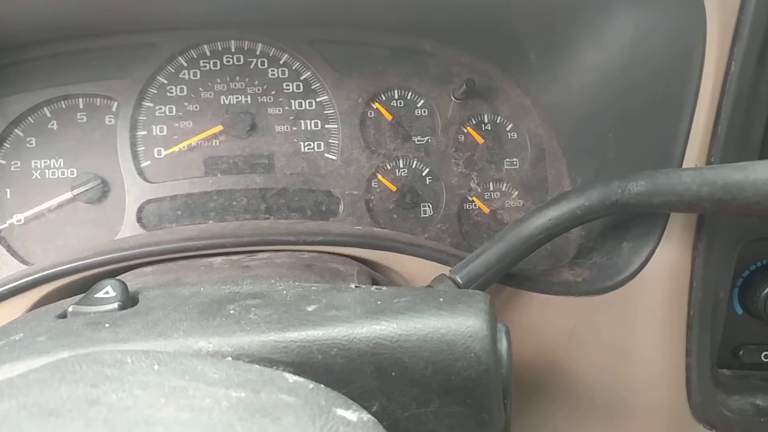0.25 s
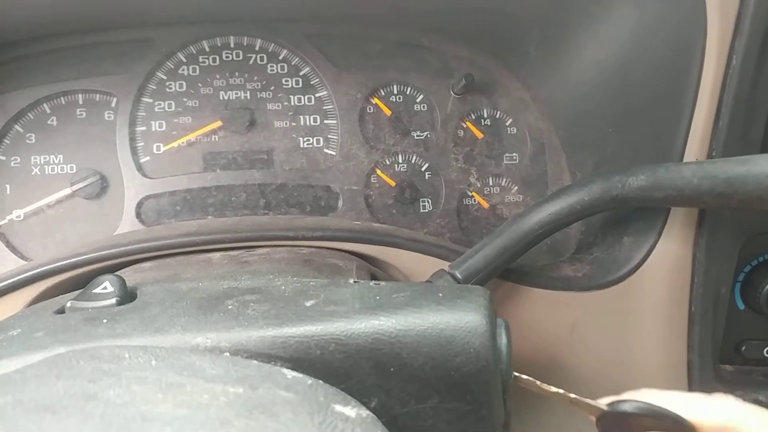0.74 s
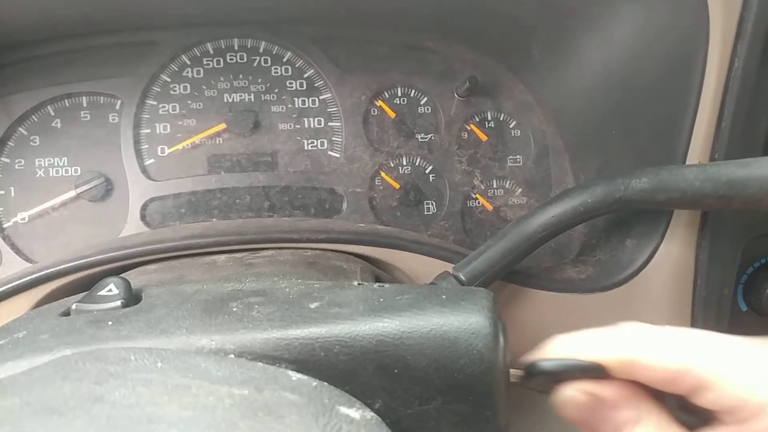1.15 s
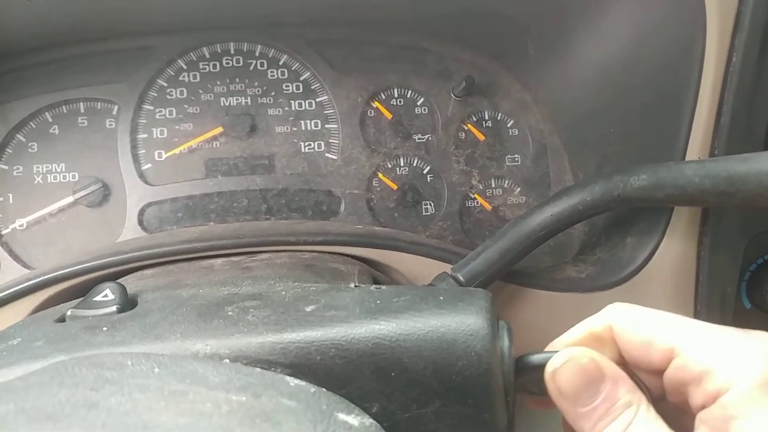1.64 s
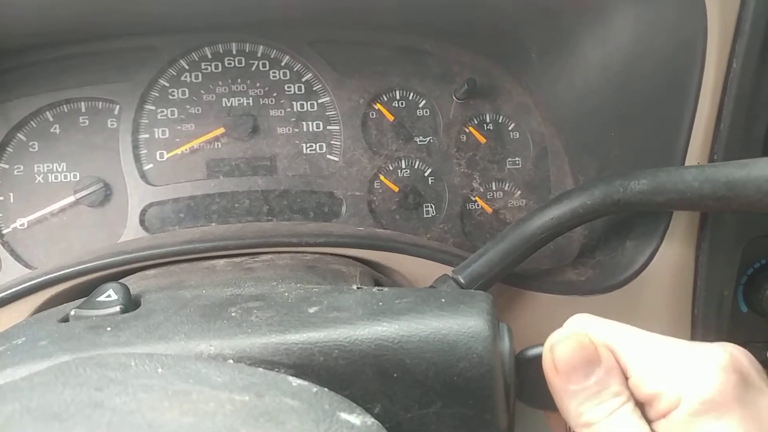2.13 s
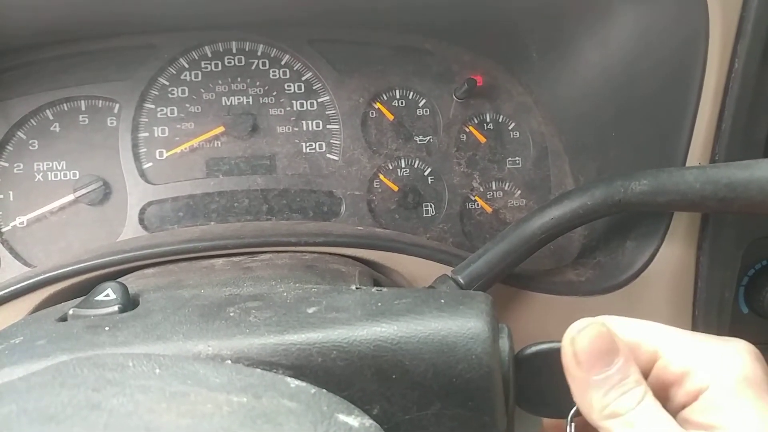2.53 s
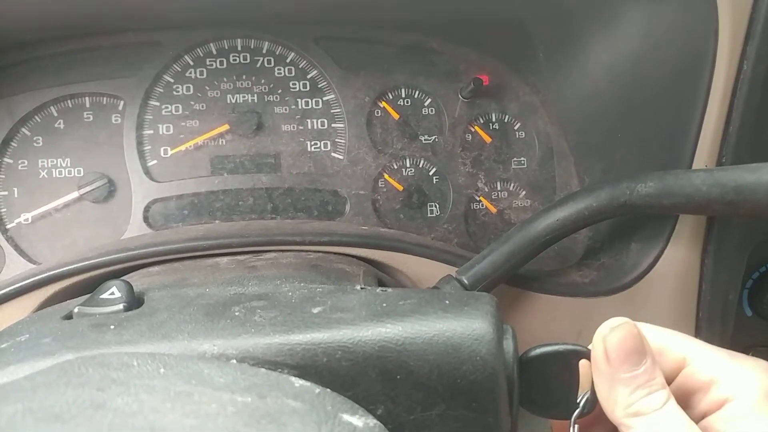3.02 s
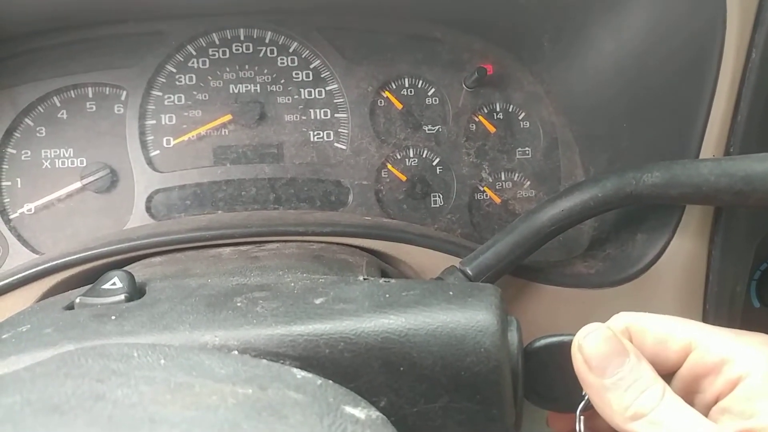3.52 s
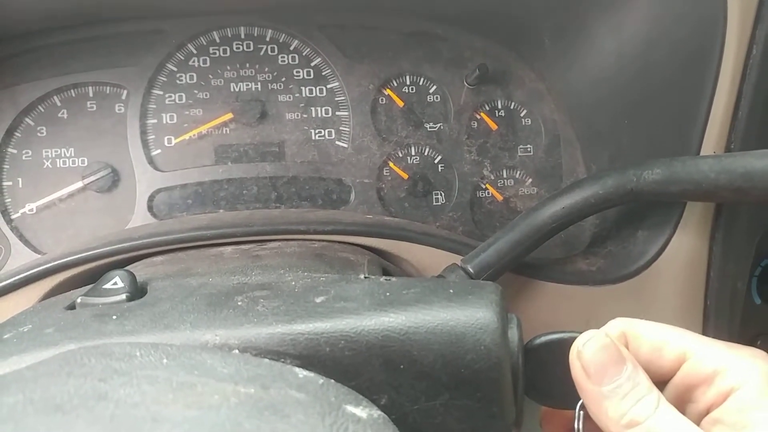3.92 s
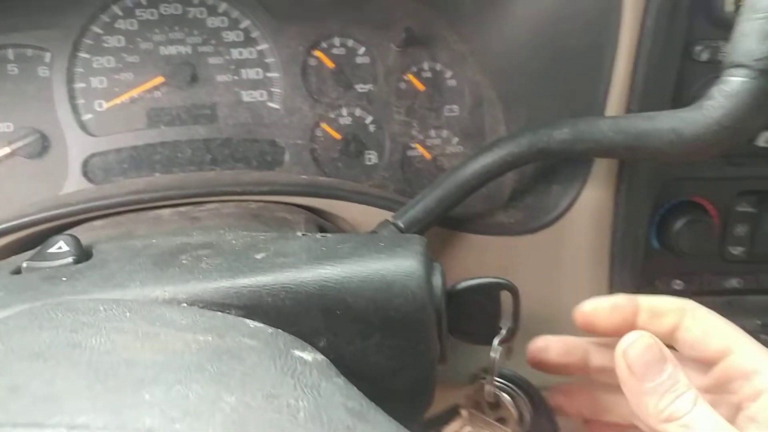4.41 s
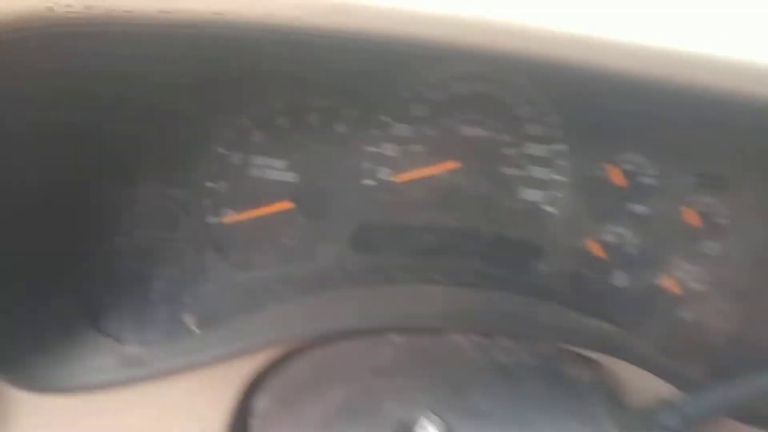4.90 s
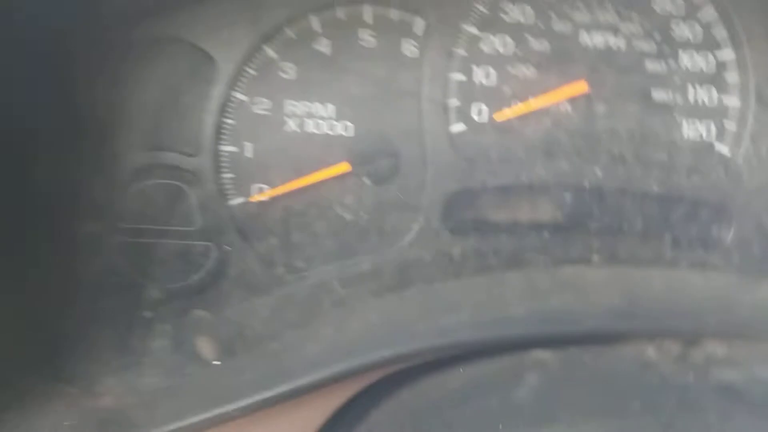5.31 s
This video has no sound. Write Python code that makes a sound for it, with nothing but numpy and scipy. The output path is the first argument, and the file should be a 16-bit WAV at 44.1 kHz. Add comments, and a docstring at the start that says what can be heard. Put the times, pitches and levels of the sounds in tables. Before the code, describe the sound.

Close hand-held stereo pickup in a parked cab: light ticks, a rasping key insertion ending in a bright snap, small rattling clicks, then a chunky detent clack as the key turns. A quiet stretch follows with faint rubbing and a thin distant bird, then handling creaks, soft thuds and a final hard plastic tap. Dull outside rumble continues throughout.

```python
"""Key turned in an ignition lock

A key is pushed into the lock of a parked vehicle and turned; nothing starts. Noise-excited resonances make pins
and detents click, beating sines make the key ring ping, shaped noise makes hand, sleeve and key blade rub.
Ringing noise rumbles from outside into the small padded cab, gliding sines are a far bird, filtered clicks creak
in the hand-held casing. The left microphone port hears the bass louder than the right."""
import sys
import numpy as np
from scipy import signal
from scipy.io import wavfile

SR = 44100
rng = np.random.default_rng(int(sys.argv[2]) if len(sys.argv) > 2 else 0)


def transcribe(signal):
    """Save signal, clipped to [-1, 1], as a 16-bit WAV file at the path in sys.argv[1]."""
    frames = np.atleast_2d(signal).T
    limited = np.clip(frames, -1, 1)
    pcm = np.round(limited * 32767).astype(np.int16)
    wavfile.write(sys.argv[1], SR, pcm)


N = 244755


def from_db(db):
    """Amplitude ratio of a level in dB."""
    return 10 ** (np.asarray(db) / 20)


def rms_one(x):
    """Scale to rms 1."""
    return x / np.sqrt(np.mean(x ** 2) + 1e-20)


def at_hz(points, hz):
    """Interpolate (Hz, value) points over log frequency."""
    point_hz, value = np.transpose(points)
    return np.interp(np.log(hz), np.log(point_hz), value)


def at_time(points, s):
    """Interpolate (s, value) points over time."""
    return np.interp(s, *np.transpose(points))


def sides(lean_db):
    """Left and right gains, lean_db apart, whose mean is 1."""
    gains = from_db([[lean_db / 2], [-lean_db / 2]])
    return gains / gains.mean()


def band(x, low_hz, high_hz):
    """Butterworth bandpass."""
    return signal.sosfilt(signal.butter(2, [low_hz, high_hz], "band", fs=SR, output="sos"), x)


def resonance(x, hz, width_hz):
    """Two-pole peak of gain 1."""
    r = np.exp(-np.pi * width_hz / SR)
    gain = (1 - r * r) / 2
    return signal.lfilter([gain, 0, -gain], [1, -2 * r * np.cos(2 * np.pi * hz / SR), r * r], x)


def double_resonance(x, hz, width_hz, second_hz, second_width_hz):
    """Two peaks in series: steeper skirts."""
    return resonance(resonance(x, hz, width_hz), second_hz, second_width_hz)


def drift(rate_hz):
    """Slow random curve of rms 1: lowpassed noise at 1/40 of the sample rate, interpolated."""
    r = np.exp(-80 * np.pi * rate_hz / SR)
    slow = signal.lfilter([1], [1, -2 * r, r * r], rng.standard_normal(N // 40 + 2002))[2000:]
    return np.interp(np.arange(N) / 40, np.arange(len(slow)), rms_one(slow))


def add(out, s, piece):
    """Mix a two-channel piece into out at time s."""
    at = round(s * SR)
    out[:, at:at + piece.shape[1]] += piece[:, :N - at]


# cab reverberation: (frequency [Hz], T60 [s])
CAB_T60 = [(150, 0.16), (500, 0.19), (1500, 0.082), (3000, 0.076), (8000, 0.043), (16000, 0.076)]
# hand-held microphone turns: (time [s], left port delay [samples])
LEFT_LAG = [(0.3, 10), (0.9, 5), (1.23, 20), (1.52, 6), (2.2, 1), (5.46, 9)]


def echoed(x, s, hz, echo_db):
    """Direct sound plus the cab's dense reflections, which build up in a few ms and differ per side and spot."""
    t = np.arange(len(x)) / SR
    decay = from_db(-60 * t / at_hz(CAB_T60, hz))
    buildup = 1 - np.exp(-t / 0.00051)
    tail = rng.standard_normal((2, len(x))) * decay * buildup
    tail *= from_db(echo_db) / np.sqrt(np.sum(tail ** 2, axis=1, keepdims=True))
    direct = np.array([np.roll(x, round(at_time(LEFT_LAG, s))), x])
    return direct + signal.fftconvolve(x[None], tail, axes=1)[:, :len(x)]


# noise floor spectrum: (frequency [Hz], relative density [dB per Hz])
FLOOR = [(76, -30), (130, -1.5), (269, -9), (298, -13.5), (420, -9.5), (465, -9), (569, -16), (1330, -21.5),
         (1590, -25), (14700, -35), (16300, -39)]
# port correlation, negatives count as 0: (frequency [Hz], left-right likeness [0-1])
LIKENESS = [(60, 1), (240, 0.68), (950, 0.29), (3770, -0.015), (15000, -0.25)]
# port balance: (frequency [Hz], left over right [dB])
LEAN = [(60, 10.5), (240, 5), (950, 7), (3770, 2.5), (15000, -1)]


def noise_floor(level_db=-65.5, flicker_db=1.07):
    """Half-octave noise bands, each with its level, lean, likeness and flicker."""
    source = rng.standard_normal((2, 2, N))
    out = 0
    edges_hz = 110 * 2 ** np.arange(0, 8, .5)
    for k, (low, high) in enumerate(zip(edges_hz, edges_hz[1:])):
        hz = np.sqrt(low * high)
        mid, side = band(source[k % 2], low, high)
        alike = np.clip(at_hz(LIKENESS, hz), 0, 1)
        pair = np.sqrt(1 + alike) * mid + np.sqrt(1 - alike) * side * [[1], [-1]]
        gain = from_db(at_hz(FLOOR, hz) + flicker_db * drift(6))
        out = out + gain * sides(at_hz(LEAN, hz)) * pair
    return from_db(level_db) * out / np.sqrt(np.mean(out.mean(0) ** 2))


# rumble envelope: (time [s], level [dB])
RUMBLE = [(0.0, -55.5), (0.73, -52.5), (1.1, -59), (1.361, -52.5), (1.761, -55.5), (2.19, -53.5),
          (2.52, -61), (2.74, -59), (3.37, -55), (3.46, -57.5), (3.99, -53), (4.65, -54.5), (5.091, -52),
          (5.55, -49.5)]
# cab air and panel modes: (frequency [Hz], width [Hz], level [dB])
RUMBLE_MODES = [(43.7, 34, -3), (65.78, 28, 0.5), (87.24, 4.3, 1.5), (135, 38, -14.5)]


def rumble(swell_db=1):
    """Far traffic and wind through the body shell, ringing the cab's lowest modes."""
    white = band(rng.standard_normal((2, N + SR)), 34, 260)
    modes = sum(from_db(db) * rms_one(double_resonance(white, hz, width, hz, 2 * width))
                for hz, width, db in RUMBLE_MODES)
    mid, own = modes[:, SR:]   # filters settle in the first second
    pair = sides(11.0) * np.array([mid, .9 * mid + .43 * own])
    gain = from_db(at_time(RUMBLE, np.arange(N) / SR) + swell_db * drift(5.5))
    return gain * pair / np.sqrt(np.mean(pair.mean(0) ** 2))


# rub hiss rung through a narrow port resonance near 1.8 kHz, plus one higher faint squeak: (start [s], length
# [s], level [dB], frequency [Hz], width [Hz])
TONED_HISSES = [(0.066, 0.067, -72.5, 1720, 250), (0.204, 0.042, -70, 1760, 200),
                (1.598, 0.17, -75.5, 2270, 150), (5.368, 0.066, -73, 1850, 303)]


def toned_hisses():
    """Breathy noise through a narrow double resonance: the ports ringing under some rubs, and one faint squeak."""
    out = np.zeros((2, N))
    for s, length, level_db, hz, width_hz in TONED_HISSES:
        noise = rng.standard_normal(round(length * SR))
        tone = rms_one(double_resonance(noise, hz, width_hz, hz, 2 * width_hz))
        add(out, s, from_db(level_db) * sides(13.0) * tone * np.hanning(len(noise)) ** .5)
    return out


# friction bands: (low [Hz], high [Hz])
BANDS_HZ = [(200, 1200), (1200, 3000), (3000, 7000), (7300, 9800), (11200, 15800)]


def friction(table, drag_colour_db, hiss_colour_db, crackle, grain_db=1.5, snags_per_s=340):
    """Swells of friction noise, a dull drag plus a bright hiss; stick-slip makes the level flutter and crackle."""
    out = np.zeros((2, N))
    for s, length, drag_db, hiss_db in table:
        size = round(length * SR)
        drag = from_db(np.add(drag_db, drag_colour_db))
        hiss = from_db(np.add(hiss_db, hiss_colour_db))
        grains = 1 + crackle * np.exp(-rng.random(size) * SR / snags_per_s)
        swell = np.hanning(size) ** .5
        for (low, high), gain in zip(BANDS_HZ, np.hypot(drag, hiss)):
            noise = rms_one(band(grains * rng.standard_normal((2, size)), low, high))
            add(out, s, gain * sides(at_hz(LEAN, low) + 1.9) * swell * noise)
    return out * from_db(grain_db * drift(87.7))


# skin and cloth rubs: (start [s], length [s], dull drag [dB], bright hiss [dB])
RUBS = [(0.067, 0.047, -79, -78), (0.203, 0.065, -74, -78.5), (1.028, 0.05, -85, -70),
        (1.618, 0.088, -69.5, -77.5), (3.052, 0.043, -66.5, -90.5), (3.19, 0.051, -68.5, -93.5),
        (3.665, 0.032, -64, -89.5), (3.851, 0.05, -67.5, -87), (3.89, 0.042, -72.5, -76),
        (4.178, 0.036, -78, -70.5), (4.312, 0.098, -60.5, -78.5), (4.38, 0.14, -57, -77.5),
        (4.558, 0.097, -72, -61.5), (4.928, 0.32, -66.5, -84.5), (5.182, 0.059, -64.5, -76),
        (5.23, 0.083, -63, -72.5), (5.359, 0.15, -71, -64.5), (5.465, 0.083, -58.5, -64.5)]
# colours over the friction bands: (gain per band [dB])
RUB_DRAG_DB = [-0.5, -26, -17.5, -40, -33.5]
RUB_HISS_DB = [-30, -3, -2.5, 1.5, -3.5]


def rubs():
    """Hand and sleeve: strongly crackling friction."""
    return friction(RUBS, RUB_DRAG_DB, RUB_HISS_DB, crackle=8.0)


# plastic steering column modes: (frequency [Hz], width [Hz], level [dB])
COLUMN = [(180, 60, -6), (336, 17, -4), (469.2, 130, -11.5), (620, 120, -8.5), (820, 67, -13.5),
          (1028.5, 80, -2), (1340, 61, 0.5), (1850, 48, 0), (1995, 84, -3), (2350, 100, -6),
          (2720, 50, -0.5), (3160, 170, -10), (3460, 100, -11), (3720, 100, -8.5)]
# lock balance before scaling by pitch: (time [s], left over right [dB])
LOCK_LEAN = [(0.3, 21), (0.8, 9.5), (1.2, 11), (1.4, 10.5), (2.2, 10.5), (4.2, 2.5), (5.46, 12.5)]


def impact_parts(chatter, knock_hz, clack_hz, snap_hz, broad):
    """(Nominal Hz, signal) of thump, knock, column ring, clack, snap, tick, sheen and wide crack."""
    mellow = band(band(chatter, 46, 9600), 46, 9600)   # the ports pass little above their resonance
    column = sum(from_db(db) * resonance(mellow, hz, width) * (-1) ** k
                 for k, (hz, width, db) in enumerate(COLUMN))
    thump = double_resonance(mellow, 70, 110, 76, 180)
    knock = resonance(mellow, knock_hz, 180) + broad * band(mellow, 370, 1700)
    clack = double_resonance(mellow, clack_hz, 230, clack_hz, 1200)
    clack += broad * band(mellow, 0.55 * clack_hz, 1.45 * clack_hz)
    snap = double_resonance(mellow, snap_hz, 770, snap_hz, 1800)
    snap += broad * band(mellow, 0.7 * snap_hz, 1.4 * snap_hz)
    tick = double_resonance(mellow, 8700, 700, 8500, 1300)
    tick += broad * band(band(mellow, 6200, 9300), 5500, 12000)
    sheen = band(band(chatter, 9700, 16000), 10500, 14000)
    crack = band(mellow, 2200, 13000)
    return [(110, thump), (knock_hz, knock), (1500, band(column, 230, 4300)), (clack_hz, clack),
            (snap_hz, snap), (8700, tick), (13000, sheen), (4500, crack)]


def contacts(table, voice, rattle, broad):
    """A main blow amid lesser impacts that build up to it and chatter out; they ring lock, key and column.
    A harder contact tilts the parts towards the treble."""
    out, lead = np.zeros((2, N)), SR // 100
    ms = (np.arange(SR // 5) - lead) * 1000 / SR
    voice_db, knock_hz, rise_ms = voice
    for (s, blow_db, clack_hz, clack_db, snap_hz, hardness_db, fall_ms, echo_db,
         body_db, tick_db, snap_db) in table:
        shape = np.exp(np.where(ms < 0, ms / max(rise_ms, .05), -ms / max(fall_ms, .1)))
        chatter = rattle * rng.standard_normal(len(ms)) * rng.random(len(ms)) ** 5 * shape
        chatter[lead] = 1
        chatter = np.roll(chatter, round(SR * rise_ms / 1000))   # listed time is the start of the build-up
        parts = impact_parts(chatter, knock_hz, clack_hz, snap_hz, broad)
        low_db = np.add(voice_db[:3], body_db)
        high_db = np.add(voice_db[3:], [snap_db, tick_db, 0, 0])
        echoes_db = [echo_db] * 7 + [echo_db + 8]   # the wide crack is heard mostly through the cab
        lock_lean_db = at_time(LOCK_LEAN, s)
        for (hz, part), wet_db, part_db in zip(parts, echoes_db, [*low_db, clack_db, *high_db]):
            tilt_db = hardness_db * np.log2(max(hz, 350) / 2500)
            part = from_db(blow_db + part_db + tilt_db + 10.0) * part / np.abs(part).max()
            # the ports differ less in the treble
            lean_db = lock_lean_db * np.clip(np.log(9000 / hz) / 1.9, .1, 1.1)
            add(out, s - lead / SR, sides(lean_db) * echoed(part, s, hz, wet_db))
    return out


# key and lock contacts that snap with almost no build-up: (time [s], level [dB], clack [Hz], clack relative
# level [dB], snap [Hz], # hardness [dB per octave], chatter decay [ms], cab echo [dB], extra into column [dB],
# extra tick [dB], # extra snap [dB])
SNAPS = [(0.3126, -37.5, 2700, -8.5, 4470, 2.5, 0.37, -6.5, -6, 1.5, -1.5),
         (0.314, -44.5, 2050, -7.5, 4400, 2, 0.55, 1, -6, 4, -1),
         (1.0359, -59.5, 2750, -11, 6230, 1, 1.5, -10, 0, 2, 0),
         (1.2176, -20, 3900, -12, 5860, -2, 1.1, 7, -3, 0.5, -2),
         (1.2205, -25.5, 1330, -6.5, 4000, 1.5, 1.1, 2.5, -4, -5, 1),
         (1.2274, -15, 4010, -14.5, 5500, 1, 2.5, 3, 2, 0.5, 2),
         (1.2314, 2, 4760, -25, 6100, -1.5, 0.77, -2, -9.5, -14, 0.5),
         (1.2342, -15, 2840, -7.5, 5900, -0.5, 1.7, -5, 5, -7, -3),
         (1.2392, -19, 2130, -13, 6110, -3.5, 2.7, -5, 4.5, -1, -7),
         (1.2442, -23.5, 1630, -10, 5960, 0, 1.3, -3, 3, 0, -11),
         (1.298, -43, 2700, -16, 6300, 0, 1.1, 0, 3, 7, -5),
         (1.3205, -47.5, 2350, -12, 5230, -0.5, 3, 7, -4, 11, -6),
         (1.3918, -45.5, 3350, -13, 4240, 6.5, 0.81, 3, 6, -4, -3),
         (1.3955, -46.5, 3300, -13, 6550, -5, 0.6, -4, 3, 2, -1.5),
         (1.5025, -50, 2920, -9, 5500, 3, 0.76, 4.5, -0.5, 6.5, -3),
         (1.5068, -52.5, 2000, -14.5, 6960, 2, 0.65, -1.5, 1, 5, 2),
         (2.1525, -36.5, 3031, -14.5, 5600, -2, 1.69, -4, 0, -9.5, 0),
         (4.1824, -61, 1527, -20, 6584, -0.5, 0.5, -5, -3.5, 2.5, 0),
         (4.9032, -53, 1520, -17.5, 6970, -1, 0.89, -3, -4, 4, -11),
         (5.4632, -14, 1827, -17, 4380, 3.5, 0.6, -7, 1.5, 2.5, -3),
         (5.4643, -17, 1850, -14.5, 5350, 3, 0.65, -9.5, 1.5, 3.5, 2),
         (5.5305, -56, 1610, -17.5, 4650, 7, 0.4, -1, -7.5, 1, 2)]
# part mix: ((thump, knock, column ring, snap, tick, sheen, wide crack) relative levels [dB], knock [Hz],
# build-up [ms])
SNAP_VOICE = [-35.5, -25, -24.5, -10, -13.5, -24, -23], 450, 0.19


def snaps():
    """Hard contacts that snap once, with next to no build-up."""
    return contacts(SNAPS, SNAP_VOICE, rattle=.3, broad=0.17)


# far bird notes: (start [s], length [s], first [Hz], last [Hz], arch above the glide [Hz], level [dB])
BIRD = [(.378, .04, 8250, 8400, 123, -89), (.535, 0.067, 8500, 8400, 418, -105),
        (.6, .08, 7050, 7000, 30.2, -93), (2.355, .18, 7030, 7000, 180, -87.5),
        (2.55, 0.11, 7200, 7030, 59.7, -89), (2.802, 0.24, 7080, 7170, 180, -86),
        (4.675, 0.077, 7220, 7140, 30.2, -84.5), (4.769, 0.13, 7130, 6930, 80, -86)]


def bird(edge_s=0.0098, waver_db=3, waver_hz=45):
    """Thin, unsteady whistles that arch in pitch and fade in and out."""
    out, t = np.zeros(N), np.arange(N) / SR
    for s, length, first_hz, last_hz, arch_hz, level_db in BIRD:
        along = np.clip((t - s) / length, 0, 1)
        glide_hz = first_hz + (last_hz - first_hz) * along + arch_hz * np.sin(np.pi * along)
        hz = glide_hz + waver_hz * drift(40)
        shape = np.clip(np.minimum(t - s, s + length - t) / edge_s, 0, 1)
        gain = np.sqrt(2) * from_db(level_db + waver_db * drift(25))
        out += gain * shape * np.sin(2 * np.pi * np.cumsum(hz) / SR)
    return out


# lock pins and detents: (time [s], level [dB], clack [Hz], clack relative level [dB], snap [Hz],
# hardness [dB per octave], chatter decay [ms], cab echo [dB], extra into column [dB], extra tick [dB],
# extra snap [dB])
CLACKS = [(0.756, -41, 2650, -4, 1900, -1, 0.56, 1, -10, -2, 7),
          (0.7585, -39, 1320, -10, 2730, -4, 0.8, 3, -5, -2, 0),
          (0.8097, -51, 2040, -9, 5820, -3.5, 1, 4.5, -1, -2, 5),
          (0.8418, -52.5, 2200, -18, 2780, -2, 1.6, -1, 5.5, 1, -5),
          (0.8575, -38.5, 2000, -4, 3500, -0.5, 1, 2, -5, -10, 11),
          (0.8598, -31.5, 3480, -3.5, 2000, -3.5, 2.0, -0.5, -11.5, -18, 10.5),
          (0.8695, -43.5, 3620, -14, 1900, -3, 2.9, -1.5, -4, 2, 1),
          (0.9881, -66.5, 1560, -24, 3640, -10, 5, 1, -0.5, 0, 0),
          (1.1825, -40, 1770, -11, 3580, -2, 1.4, 0, 0.5, 0.5, -2),
          (1.338, -43.5, 2500, -16, 3160, -1.5, 8, 4, 0.5, -4, -7),
          (1.374, -36.5, 1120, -12, 3650, -6, 1.1, -1, -1.5, 0, -2),
          (1.3845, -46, 1130, -17, 3530, -9.5, 1.2, -5, 2.5, 8, -4),
          (1.4514, -51.5, 2310, 0.5, 4500, 7, 3, 3, -18, -5, 12),
          (1.4693, -38, 1400, -21, 2306, -5, 0.91, 1.5, 1, -2, -13),
          (1.4745, -42.5, 980, -12.5, 5200, -7, 0.9, -3, 1.5, -4, 1),
          (1.485, -46, 1900, -14, 3600, -2, 2, -7, 1, -4, 0),
          (1.522, -28, 1860, -10, 3520, -2.5, 2.0, -2, -2, -9.5, -0.5),
          (1.5245, -39, 3510, -5.5, 4820, -3, 0.8, 1, -15, -14, -7),
          (1.6114, -64.5, 1270, -24.5, 5050, -3.5, 5, 6, 3, -1, -0.5),
          (2.1565, -23, 2495, -9, 5000, 1.5, 2.3, 1.5, 1.5, -1, 3),
          (2.1597, -23.5, 1980, -12, 3530, -0.5, 1.9, -1, -3, -2.5, 3.5),
          (2.2098, -24, 1850, -14, 4040, 0, 0.91, -5, 0.5, 1.5, 3),
          (2.2122, -14, 2700, -10.5, 4320, 1.5, 0.51, -6.5, 1.5, 1.5, 4),
          (2.2141, -10, 1370, -18, 4370, -0.5, 0.5, -6.5, 2, 0, 1.5),
          (2.2168, -13.5, 1850, -10, 5320, 1.5, 1.2, -3.5, -0.5, -1, 2),
          (2.223, -22.5, 1980, -13.5, 3300, -1, 3, -0.5, -2, -1.5, 3),
          (2.2335, -28.5, 2000, -10.5, 3500, 0, 5, -0.5, 0.5, -2, 2.5),
          (2.249, -38, 1904, -11, 3782, 2.5, 3, -4.5, -3.5, -2, 2),
          (5.243, -63.5, 1332, -8, 4017, -0.5, 5.9, 1, 4, 0, 5)]
# part mix: ((thump, knock, column ring, snap, tick, sheen, wide crack) relative levels [dB], knock [Hz],
# build-up [ms])
CLACK_VOICE = [-38.5, -15.5, -13, -18.5, -10.5, -27.5, -18], 1030, 1.2


def clacks():
    """Pins and detents: contacts with a longer build-up."""
    return contacts(CLACKS, CLACK_VOICE, rattle=.33, broad=0.6)


# low thuds: (time [s], level [dB], frequency [Hz], width [Hz])
THUDS = [(0.757, -56, 620, 80), (1.228, -39, 330, 41), (1.2, -36.5, 180, 32), (1.393, -47.5, 77.6, 18),
         (1.47, -49, 620, 89), (1.538, -39, 60.8, 18), (2.157, -47, 380, 73), (2.16, -50, 118, 18),
         (2.226, -47, 461, 70), (2.239, -45, 64, 18), (4.603, -41, 67.7, 18), (4.961, -46.5, 74.63, 18),
         (5.455, -44, 60, 25), (5.46, -45.5, 190, 42), (5.463, -50.5, 406, 80)]


def thuds():
    """Soft low thuds, as when the hand lands on the column: critically damped swells of a sine."""
    out, t = np.zeros((2, N)), np.arange(SR // 5) / SR
    for s, level_db, hz, width_hz in THUDS:
        swell = np.e * np.pi * width_hz * t * np.exp(-np.pi * width_hz * t)
        add(out, s, from_db(level_db) * sides(16.9) * swell * np.sin(2 * np.pi * hz * t))
    return out


# key blade over the pins: (start [s], length [s], dull drag [dB], bright hiss [dB])
STROKES = [(1.15, 0.066, -72, -64), (1.175, 0.1, -47, -56), (1.235, 0.066, -75, -43),
           (1.29, 0.062, -82, -52.5), (1.365, 0.087, -82, -62), (1.335, 0.04, -60, -65.5),
           (1.44, 0.071, -61, -60.5), (1.495, 0.16, -69.5, -69)]
# colours over the friction bands: (gain per band [dB])
STROKE_DRAG_DB = [-0.5, -4.5, -19, -39, -36.5]
STROKE_HISS_DB = [-26, -19.5, -3.5, -0.46, -1]


def key_strokes():
    """Key blade grating over the lock pins: friction with lighter crackle."""
    return friction(STROKES, STROKE_DRAG_DB, STROKE_HISS_DB, crackle=2.5)


# key ring touches: (time [s], level [dB], extra lowest mode when struck on its edge [dB])
PINGS = [(1.251, -44, 0), (1.3217, -55.5, 32), (1.461, -42, -14), (1.535, -64, 7), (2.0325, -71, 0.5)]
# ring modes: (frequency [Hz], split [Hz], T60 [s], level [dB])
KEY_RING = [(10800, 60, 0.027, -21), (12755, 49, 0.068, -4.5), (15040, 130, .07, -16)]


def key_ring():
    """Small steel rings have split modes that beat as they die."""
    out, t = np.zeros((2, N)), np.arange(SR // 5) / SR
    for s, ping_db, edge_db in PINGS:
        for k, (hz, split_hz, t60, mode_db) in enumerate(KEY_RING):
            pair = np.sin(2 * np.pi * hz * t) + 0.5 * np.sin(2 * np.pi * (hz + split_hz) * t)
            level_db = ping_db + mode_db + edge_db * (k == 0) + 6.0
            tone = np.pad(from_db(level_db - 60 * t / t60) * pair, SR // 1000)   # room for the port lag
            add(out, s - 1 / 1000, echoed(tone, s, hz, 0.0))
    return out


# casing creaks beside the left port: (time [s], tick level [dB], thud level [dB], top [Hz])
CREAKS = [(4.335, -55.5, -61, 2510), (4.365, -57, -61, 2800), (4.405, -56, -58, 3200),
          (4.43, -52.5, -59.5, 3500), (4.4503, -43.5, -37.5, 3454), (4.46, -43.5, -51.5, 2350),
          (4.48, -52, -62.5, 2550), (4.542, -62.5, -64, 4650), (4.564, -39, -54, 9100),
          (4.567, -47, -65.5, 9000), (4.579, -50, -66, 6030), (4.598, -25.5, -61.5, 12900),
          (4.603, -19, -29, 11050), (4.6158, -39.5, -44, 7020)]


def creaks(lean_db=26, slip_loss_db=12.5):
    """Dry ticks carried through the hand-held casing, each with two lesser slips and a soft thud."""
    out, click = np.zeros((2, N)), np.zeros(SR // 10)
    click[0] = 1
    thud = double_resonance(click, 110.0, 20.2, 138, 1280)
    decay = np.exp(-np.arange(len(click)) / 140.0)
    for s, tick_db, thud_db, top_hz in CREAKS:
        add(out, s, sides(lean_db) * from_db(thud_db) * thud / np.abs(thud).max())
        slips_ms = np.cumsum([0, *rng.uniform(1.292, 1.411, 2)])
        for k, late_ms in enumerate(slips_ms):
            burst = -click + 0.079 * rng.standard_normal(len(click)) * decay
            tick = band(band(burst, 460, top_hz), 111, top_hz)
            tick += (top_hz / 11000) ** 3 * resonance(burst, 7700, 1800)
            piece = from_db(tick_db - slip_loss_db * k) * tick / np.abs(tick).max()
            add(out, s + late_ms / 1000, sides(lean_db) * piece)
    return out


def scene():
    """Near sounds through the ports, plus bird, rumble and floor."""
    lock = snaps() + clacks() + key_strokes()
    hand = toned_hisses() + rubs() + thuds()
    near = lock + hand + key_ring() + creaks()
    ports = near - .75 * resonance(near, 10500, 2000)   # the microphone ports cancel a narrow treble band
    return ports + bird() + rumble() + noise_floor()


def record(dry):
    """Full scale clips, then a steep lowpass cuts the top."""
    lowpass = signal.ellip(10, .5, 60, 16430, fs=SR, output="sos")
    return signal.sosfilt(lowpass, np.clip(dry, -1, 1))


dry = scene()
out = record(dry)
transcribe(out)
```